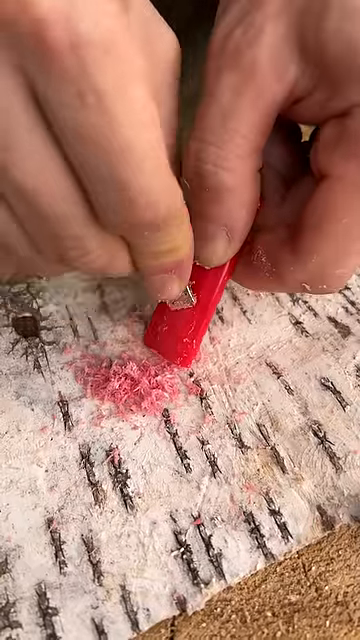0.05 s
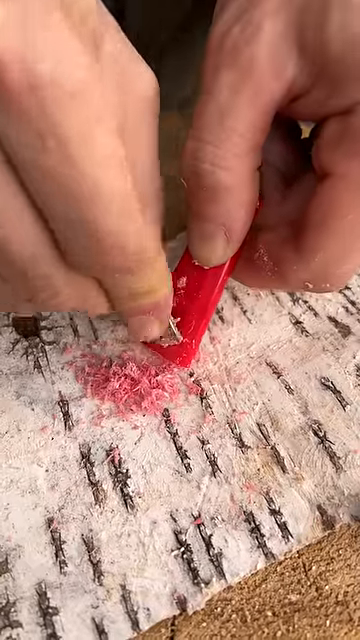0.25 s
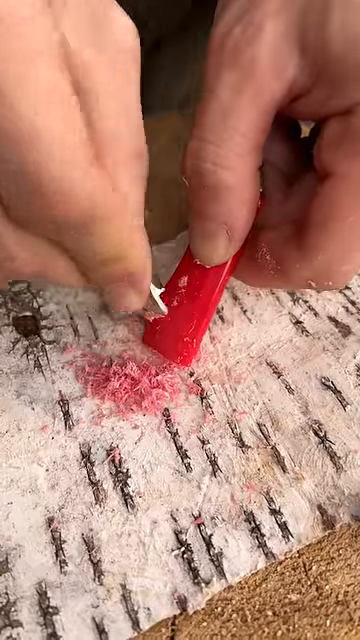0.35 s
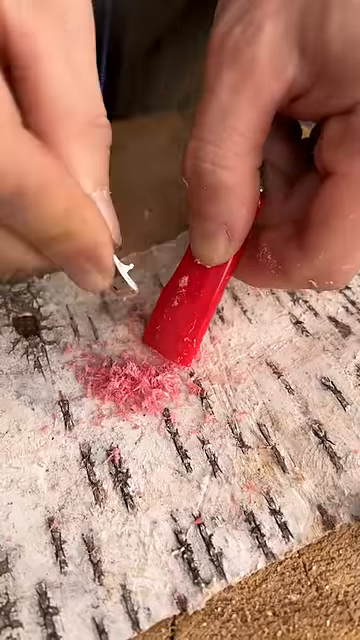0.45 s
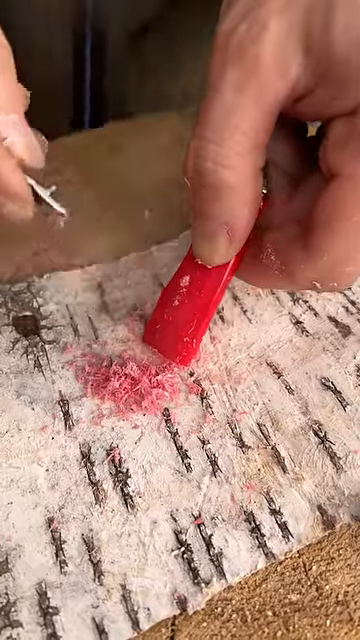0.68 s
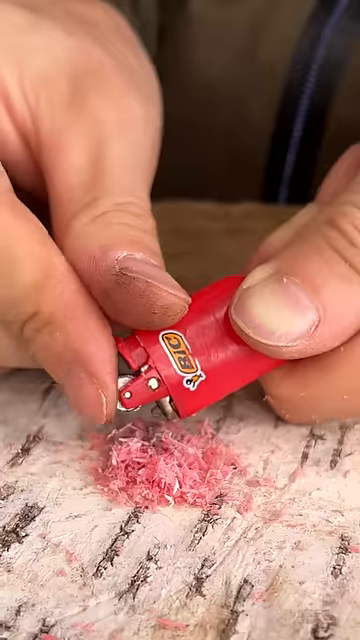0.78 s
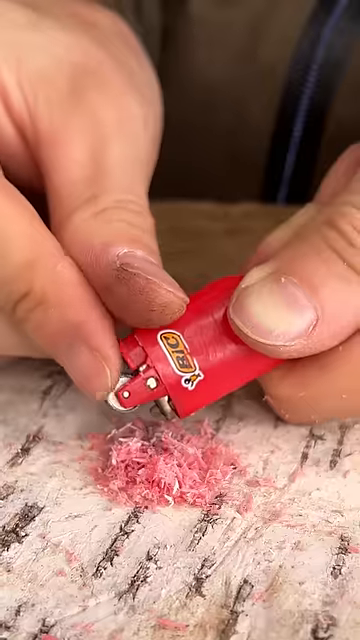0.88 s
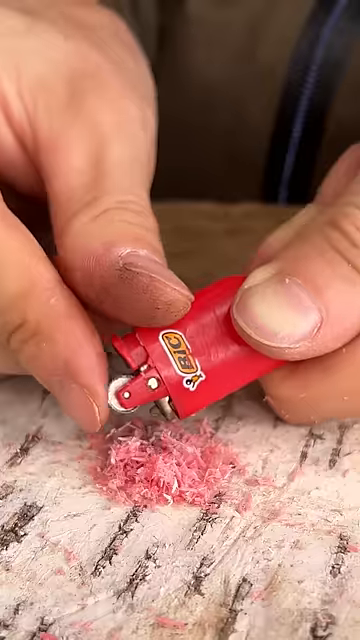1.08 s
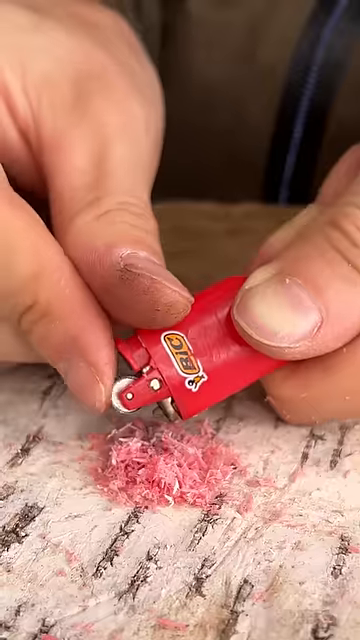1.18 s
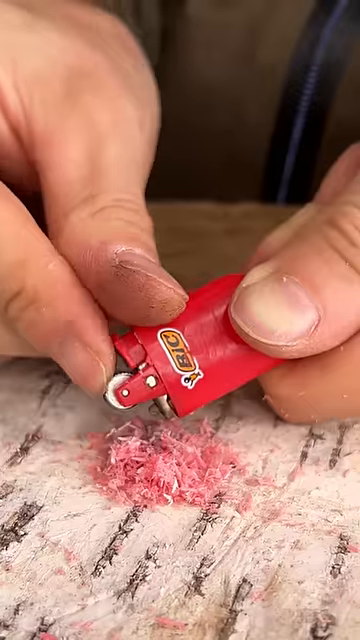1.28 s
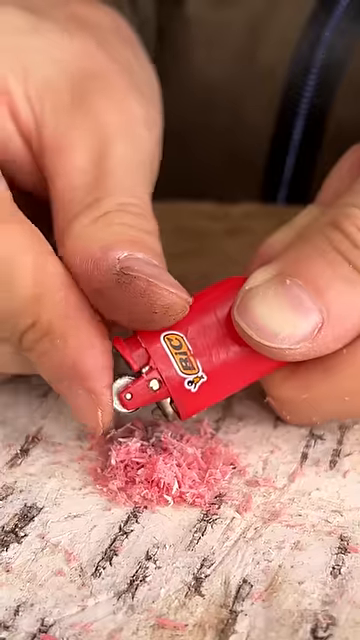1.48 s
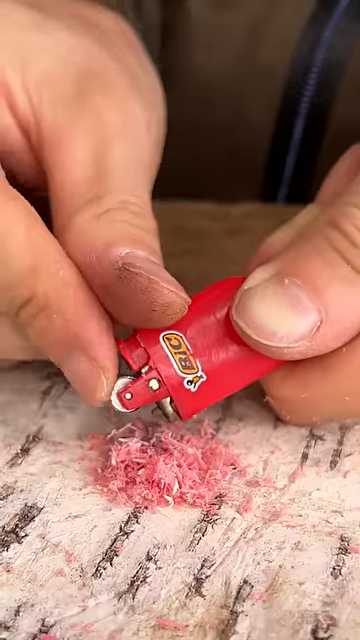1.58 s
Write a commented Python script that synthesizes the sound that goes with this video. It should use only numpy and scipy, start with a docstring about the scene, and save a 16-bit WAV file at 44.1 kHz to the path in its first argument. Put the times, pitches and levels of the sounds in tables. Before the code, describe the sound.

Heard close up outdoors, a blade scratches a plastic lighter, ending in a click and a loud, low thump on bark. Three slow, gritty turns of the spark wheel follow, with soft finger bumps and faraway bird whistles.

```python
"""Scraping and sparking a lighter

Outdoors, close up: a blade scrapes shavings off a plastic lighter, slips off its end, and the hand
thumps a bark-covered stump. Then the spark wheel is turned slowly three times, its teeth rasping over
the flint, with soft handling noise between. Small birds whistle far off over a faint wash of air."""
import sys
import numpy as np
from scipy import signal
from scipy.fft import rfft, irfft
from scipy.io import wavfile

SR = 44100
rng = np.random.default_rng(int(sys.argv[2]) if len(sys.argv) > 2 else 0)


def dump_mix(stems):
    """Bounce the given channels to the path in sys.argv[1] as a 16-bit WAV at rate SR."""
    frames = np.atleast_2d(stems).T  # one column per channel
    limited = np.clip(frames, -1, 1)  # hard clip at full scale
    pcm = np.round(limited * 32767).astype(np.int16)
    wavfile.write(sys.argv[1], SR, pcm)


N = 72765
T = np.arange(N) / SR


def amp(db):
    """Decibels to gain."""
    return 10 ** (np.asarray(db) / 20)


def unit(x):
    """Scales to rms 1."""
    return x / np.sqrt(np.mean(x ** 2) + 1e-20)


def drift(rate_hz):
    """Random wander of rms 1, mostly below rate_hz."""
    lowpass = 1 / (1 + (np.fft.rfftfreq(N, 1 / SR) / rate_hz) ** 4)
    return unit(irfft(rfft(rng.standard_normal(N)) * lowpass, N))


def colour(x, spectrum):
    """Minimum-phase filter of energy 1; the spectrum sets shape only."""
    hz, db = np.transpose(spectrum)
    bins_hz = abs(np.fft.fftfreq(4096, 1 / SR))
    log_gain = np.log(amp(np.interp(np.log(bins_hz + 1), np.log(hz), db)))
    taps = np.fft.ifft(np.exp(np.conj(signal.hilbert(log_gain)))).real[:2048]
    return signal.fftconvolve(x, taps / np.linalg.norm(taps))[:N]


def ring(x, hz, width_hz):
    """One resonance of energy 1; its pitch may move."""
    carrier = np.exp(2j * np.pi * np.cumsum(hz * np.ones(N)) / SR)
    pole = np.exp(-np.pi * width_hz / SR)
    envelope = signal.lfilter([1], [1, -pole], x / carrier + 1e-18)
    return np.sqrt(2 * (1 - pole ** 2)) * (carrier * envelope).imag


def grains(per_s, spread_db=0):
    """Random tiny clicks, rms 1."""
    size = amp(spread_db * np.minimum(rng.exponential(1, N), 4))
    return unit(size * rng.choice([-1, 1], N) * (rng.random(N) < per_s / SR))


def gate(start, length, rise_s, fall_s):
    """Rises, holds, and dies after the length."""
    return np.clip((T - start) / rise_s, 0, 1) * np.exp(-np.maximum(T - start - length, 0) / fall_s)


def swell(middle, length):
    """A smooth rise and fall."""
    return np.exp(-(2 * (T - middle) / length) ** 2)


def snap(start, decay_s):
    """Jumps to 1 and dies away."""
    return (T >= start) * np.exp(-abs(T - start) / decay_s)


def puff(start, peak_s):
    """Swells quickly to 1, then dies away."""
    u = np.maximum(T - start, 0) / peak_s
    return u * np.exp(1 - u)


def struck(start, hz, t60_s, rise_s):
    """A softly struck, dying sine."""
    t = np.maximum(T - start, 0)
    return np.minimum(t / rise_s, 1) * np.exp(-np.log(1000) * t / t60_s) * np.sin(2 * np.pi * hz * t)


# Outdoor air spectrum: freq_hz, gain_db
AIR_SPECTRUM = [(15, -28), (25, 6), (75, 0), (126, -5.5), (359, -7), (469, -10), (582, -9.5), (826, -7),
                (1750, -18), (3340, -18.5), (4620, -23.5), (15500, -29)]
# Air level: time_s, level_db
AIR_LEVEL = [(0, -52.5), (.4, -52), (.79, -53), (.82, -47.5), (1.65, -45)]


def air():
    """A faint, slightly uneven outdoor wash with a low drone."""
    drone = amp(-57.5) * ring(rng.standard_normal(N), hz=124.3, width_hz=17)
    wash = colour(rng.standard_normal(N), AIR_SPECTRUM)
    level_db = np.interp(T, *np.transpose(AIR_LEVEL)) - .25 * drift(rate_hz=50)
    return drone + wash * amp(level_db)


# Bird notes: start_s, length_s, first_hz, middle_hz, last_hz, level_db
BIRD_NOTES = [(0.078, 0.027, 7800, 8440, 7800, -61.5), (0.097, 0.04, 7660, 7900, 7400, -57.5),
              (0.266, 0.034, 7970, 8020, 7400, -60.5), (0.289, 0.035, 7440, 7880, 6800, -57.5),
              (0.321, 0.098, 7000, 6640, 6670, -60), (0.445, 0.038, 8750, 8020, 8350, -57),
              (0.471, 0.075, 8060, 8560, 7970, -54), (0.47, 0.034, 4040, 4130, 5030, -56.5),
              (0.712, 0.08, 7520, 7660, 7300, -54.5), (0.724, 0.024, 8120, 8500, 7800, -54),
              (0.798, 0.03, 6850, 7280, 7400, -49.5), (0.831, 0.042, 7250, 7500, 6840, -50),
              (0.935, 0.038, 4200, 4380, 4100, -61), (0.95, .073, 3670, 3370, 3300, -56.5),
              (1.058, 0.053, 3736, 3740, 3795, -48), (1.145, 0.03, 4140, 4200, 4130, -47.5)]


def birds(edge_s=.006, waver=.013, flutter_db=3, echo_t60_s=.4, echo_db=-3):
    """Thin arched whistles that flutter slightly, with echoes from the trees."""
    song = np.zeros(N)
    for start, length, first, middle, last, db in BIRD_NOTES:
        t = T - start
        u = np.clip(2 * t / length - 1, -1, 1)
        hz = middle + (last - first) / 2 * u + ((first + last) / 2 - middle) * u ** 2
        hz *= 1 + waver * drift(rate_hz=390)
        envelope = np.clip(np.minimum(t, length - t) / edge_s, 0, 1)
        song += amp(db) * envelope * np.sin(2 * np.pi * np.cumsum(hz) / SR)
    song *= amp(flutter_db * drift(rate_hz=320))
    tail = rng.standard_normal(N) * np.exp(-np.log(1000) * T / echo_t60_s)
    return song + amp(echo_db) * signal.fftconvolve(song, tail / np.linalg.norm(tail))[:N]


# Grip shifts: middle_s, length_s, level_db
FINGER_RUBS = [(0.588, 0.24, -52.5), (1.124, 0.068, -53.5), (1.464, 0.049, -49.5)]
# Skin on plastic: freq_hz, gain_db
SKIN_SPECTRUM = [(200, -38), (1200, 10), (2200, 7), (4000, 13.5), (6500, 6), (9000, -1), (15000, -7)]
# Dull bumps of the held lighter: start_s, level_db, pitch_hz
LIGHTER_BUMPS = [(.82, -49, 120.7), (1.211, -35, 90), (1.259, -33.5, 59.6), (1.374, -39, 64),
                 (1.534, -34.5, 107.2), (1.58, -34.5, 73)]


def handling():
    """Fingers slide over the lighter and bump it."""
    pressure = sum(amp(db) * swell(middle, length) for middle, length, db in FINGER_RUBS)
    bumps = sum(amp(db) * struck(start, hz, t60_s=.27, rise_s=.0084) for start, db, hz in LIGHTER_BUMPS)
    return colour(pressure * grains(per_s=11000, spread_db=1.5), SKIN_SPECTRUM) + bumps


def teeth(start, length, db, sag_db, teeth_per_s, rise_s, jitter=.24, spread_db=.7, drag=.29):
    """Force on the flint in one turn: an uneven train of tooth strikes over a steady drag."""
    gaps, sizes = rng.standard_normal((2, 40))
    times = start + (np.cumsum(np.maximum(1 + jitter * gaps, .5)) - 1) / teeth_per_s
    train = drag + sum(amp(spread_db * size) * puff(at, peak_s=.001) for at, size in zip(times, sizes))
    train /= np.sqrt(np.mean(train[(T > start) & (T < start + length)] ** 2))
    progress = np.clip((T - start) / length, 0, 1)
    return train * gate(start, length, rise_s, fall_s=.011) * amp(db + sag_db * progress ** 2)


# Spark wheel turns: start_s, length_s, level_db, sag_db, teeth_per_s, rise_s
WHEEL_TURNS = [(0.804, 0.12, -33, -4.5, 151, 0.021), (1.177, 0.091, -31, -1, 171, 0.031),
               (1.519, 0.11, -29.5, -5.5, 160, 0.036)]
# First bites into the flint: start_s, peak_db
FLINT_BITES = [(0.8169, -34), (1.533, -31.5), (1.543, -30.5)]
# Wheel and metal hood modes: pitch_hz, width_hz, gain_db
WHEEL_MODES = [(2283, 108, -12), (3212, 98, -4.5), (3353, 170, -9), (4150, 160, -20), (8070, 140, -22),
               (9280, 340, -21.5)]
# Flint rasp: freq_hz, gain_db
FLINT_SPECTRUM = [(100, 13.5), (900, 11), (1600, -13), (3000, -3), (4900, 1), (10000, 9), (15000, -16)]


def spark_wheel(grit_per_s=20000, wander=.011, rasp_db=-15.5, cutoff_hz=14000):
    """Each tooth tears grit from the flint, ringing wheel and hood; their pitch shifts with contact."""
    force = sum(teeth(*turn) for turn in WHEEL_TURNS)
    bite = sum(amp(db) * puff(start, peak_s=.0009) for start, db in FLINT_BITES)
    shift = 1 + wander * drift(rate_hz=50)
    rings = sum(amp(db) * ring(force * grains(grit_per_s), hz * shift, width)
                for hz, width, db in WHEEL_MODES)
    rings += ring(bite * grains(grit_per_s), hz=3850, width_hz=500)
    rasp = amp(rasp_db) * colour((force + bite) * grains(grit_per_s), FLINT_SPECTRUM)
    return signal.sosfilt(signal.butter(8, cutoff_hz, fs=SR, output="sos"), rings + rasp)


# Hand landing and rocking: start_s, level_db, rise_s
HAND_THUMPS = [(0.2164, -0.8, 0.0072), (0.259, -18.5, 0.0078), (0.315, -34.5, .004)]
# Modes of the bark on the stump: pitch_hz, gain_db, t60_s
STUMP_MODES = [(40.6, -38, 1), (61.6, -18.5, 0.31), (112.5, -27.5, 0.47), (125.9, -1.5, 0.13),
               (199.7, -34, 0.43), (282, -22.5, 0.089)]


def stump_thump():
    """The hand sets the bark and stump booming."""
    return sum(amp(db + mode_db) * struck(start, hz, t60_s, rise_s)
               for start, db, rise_s in HAND_THUMPS for hz, mode_db, t60_s in STUMP_MODES)


# Blade impacts: start_s, peak_db
BLADE_KNOCKS = [(.2052, -21), (.2088, -22), (.2182, -14.5), (.246, -31.5)]
# Impact spectrum: freq_hz, gain_db
KNOCK_SPECTRUM = [(100, -11), (400, 7.5), (950, 6.5), (1500, -2.5), (2100, 0.5), (4200, -9.5), (7000, -42),
                  (15000, -57)]


def blade_knocks():
    """Short cracks where the blade catches or lands."""
    force = sum(amp(db) * snap(start, decay_s=.0022) for start, db in BLADE_KNOCKS)
    return colour(force * rng.choice([-1, 1], N), KNOCK_SPECTRUM)


# Blade strokes: start_s, length_s, first_db, last_db
BLADE_STROKES = [(-.005, 0.069, -32.5, -44.5), (0.137, 0.081, -45, -27.5), (0.237, 0.033, -49, -45)]
# Plastic body under the blade: freq_hz, gain_db
PLASTIC_SPECTRUM = [(60, -7), (125, 6), (220, -13.5), (700, -4.5), (1400, -10), (2200, -1), (2800, -5.5),
                    (4000, -1.5), (4800, -8), (6200, -8.5), (6900, -14), (7700, -26.5), (10500, -26),
                    (12200, -21.5), (13500, -39), (15500, -29)]
# Squeaks under blade or finger: middle_s, length_s, pitch_hz, level_db
PLASTIC_SQUEAKS = [(0.161, 0.026, 2330, -35), (0.187, 0.04, 6170, -35.5), (0.196, 0.039, 4010, -31),
                   (0.257, 0.0088, 3760, -33.5), (1.371, 0.015, 2230, -48.5)]


def blade_scrape(slips_per_s=4500, spread_db=1.4, catch_db=1.5):
    """The blade sticks and slips on the plastic as pressure changes, catching and squeaking."""
    force = np.zeros(N)
    for start, length, first_db, last_db in BLADE_STROKES:
        pressure = amp(np.interp(T, [start, start + length], [first_db, last_db]))
        force += pressure * gate(start, length, rise_s=.0099, fall_s=.003)
    force *= amp(catch_db * drift(rate_hz=220))
    squeaks = sum(amp(db) * ring(swell(middle, length) * grains(slips_per_s, spread_db), hz, width_hz=280)
                  for middle, length, hz, db in PLASTIC_SQUEAKS)
    return colour(force * grains(slips_per_s, spread_db), PLASTIC_SPECTRUM) + squeaks


def scene():
    """All sources at one close microphone."""
    mix = blade_scrape() + blade_knocks() + stump_thump() + spark_wheel() + handling() + birds() + air()
    return mix[None]


def record(dry):
    """Low-pass at 15.8 kHz."""
    taps = signal.firwin(511, 15800, window=("kaiser", 9), fs=SR)
    return signal.oaconvolve(dry, taps[None], "same")


dry = scene()
out = record(dry)
dump_mix(out)
```